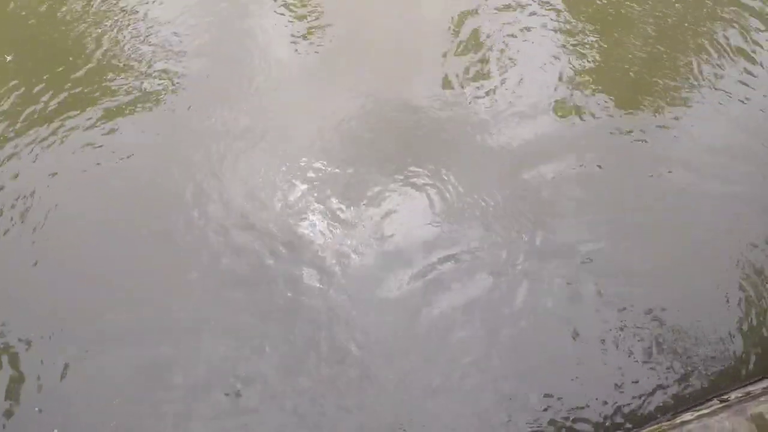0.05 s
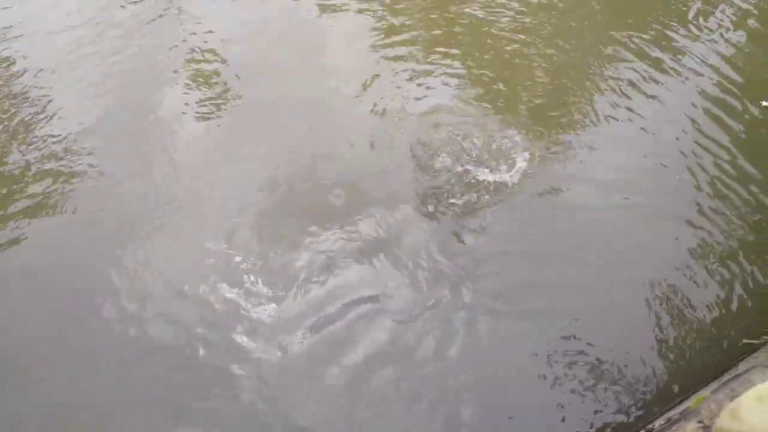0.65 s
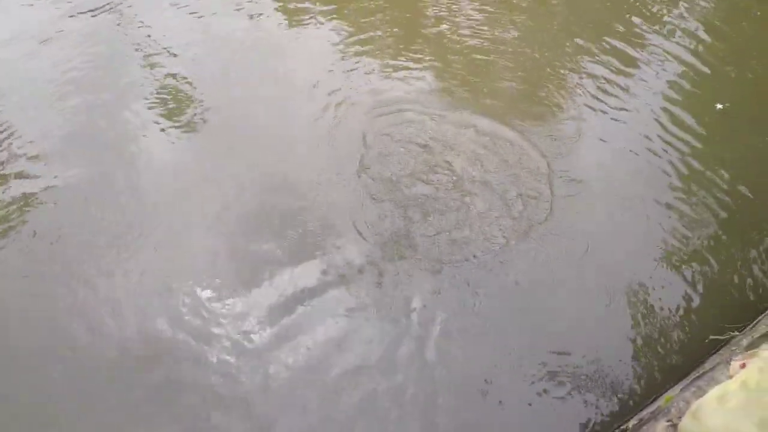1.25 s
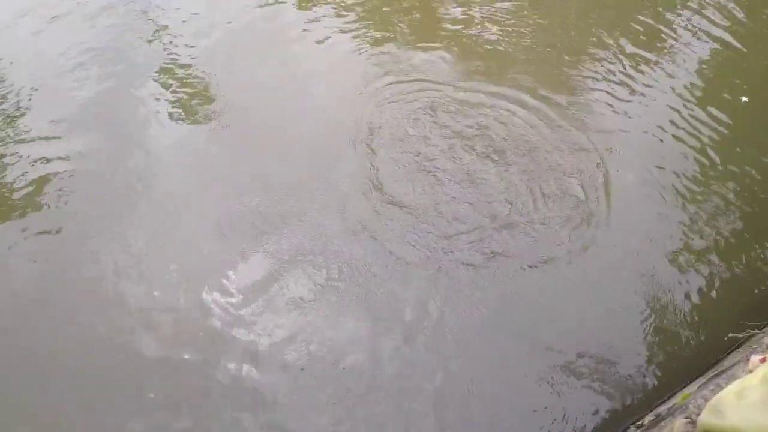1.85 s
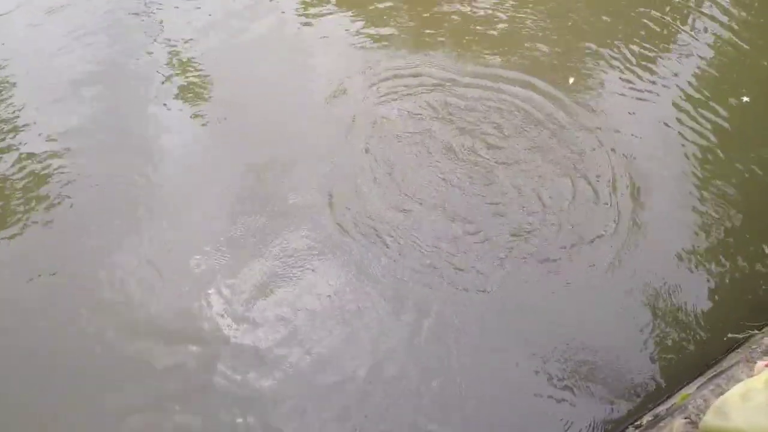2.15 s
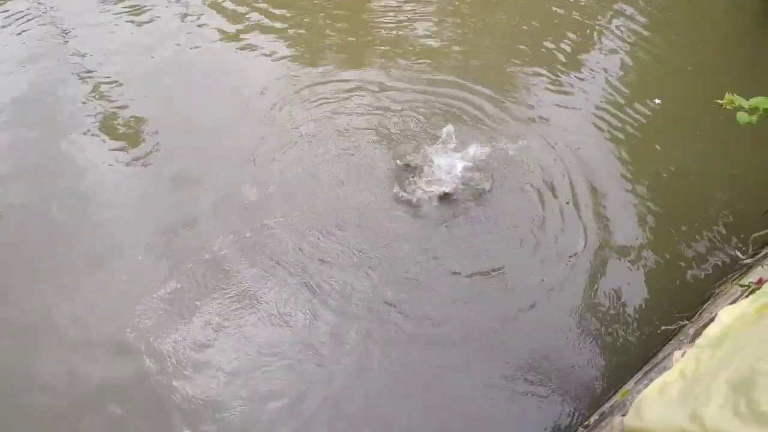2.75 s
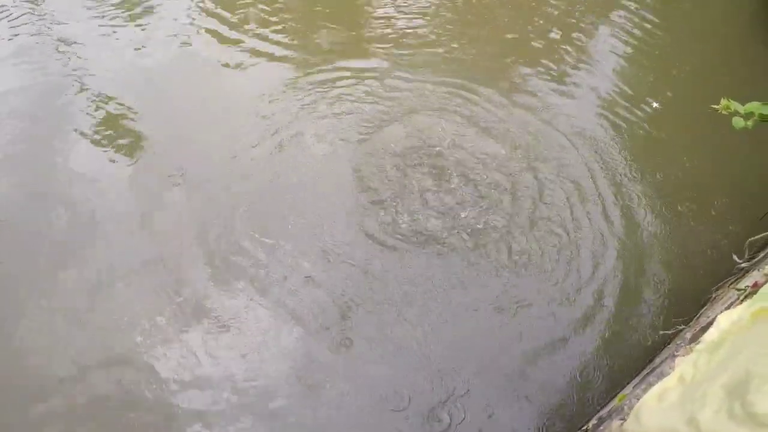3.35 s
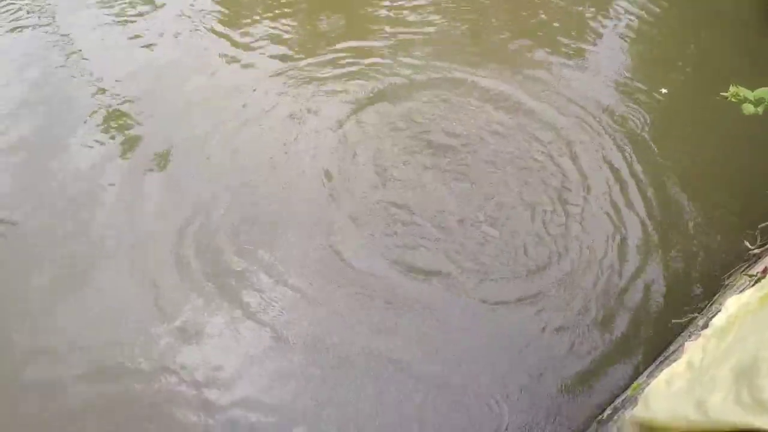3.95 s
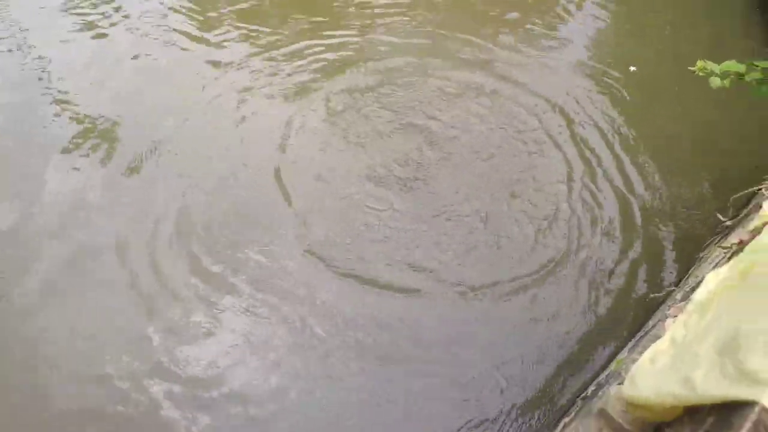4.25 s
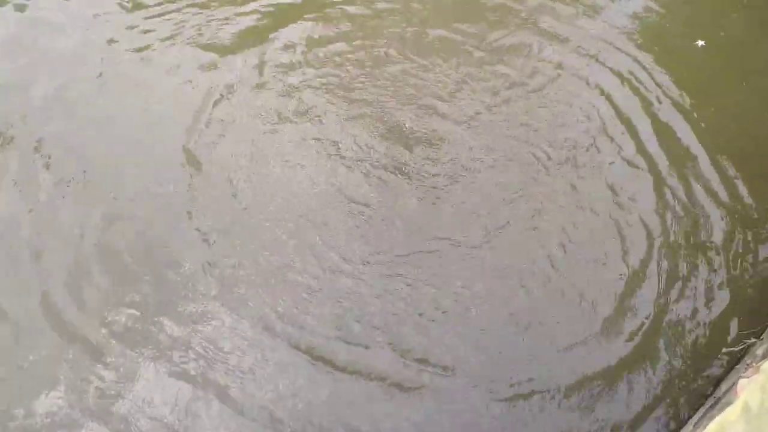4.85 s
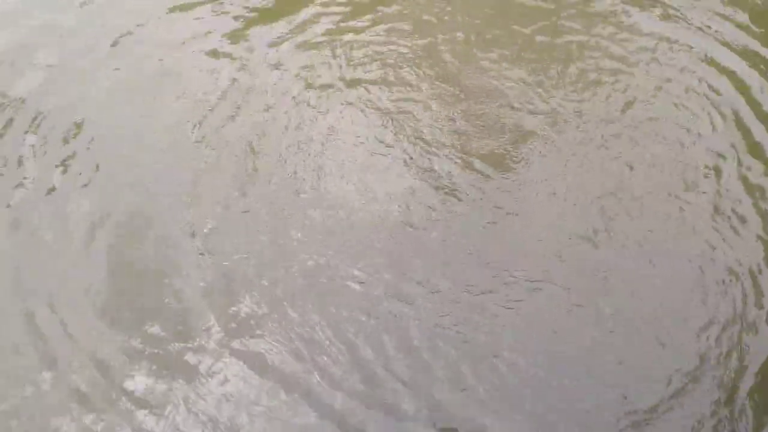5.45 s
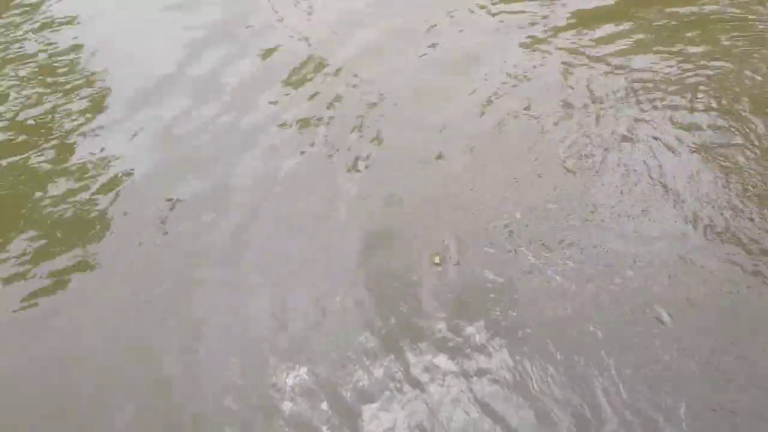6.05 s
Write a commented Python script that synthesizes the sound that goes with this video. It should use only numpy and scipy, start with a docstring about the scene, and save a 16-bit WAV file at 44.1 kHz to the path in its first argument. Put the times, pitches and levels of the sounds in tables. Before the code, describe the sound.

A low outdoor rumble, a distant machine hum and a faint hiss run throughout. Right from the start, fish make small wet ticks and plops at the surface of a pond. At 0.5 seconds comes a short splash with slaps and bubbling water, and drops patter back until about 1.6 seconds. After a lull, a few plops at 2.4 seconds lead into a louder double splash from 2.7 to 3.1 seconds, slightly left of centre, with sharp slaps, hollow gulps and spray that fizzes away. Between 4.0 and 4.4 seconds, four dry knocks strike the microphone's casing, mostly on the left, the second much the loudest. A crow then caws from the trees at about 4.6, 5.2 and 5.8 seconds, each call short, raspy and fairly quiet, with a slight echo.

```python
"""Fish in a pond, knocks and a crow.

Fish break the surface twice: slaps, ringing bubbles, churned water, gulps and falling spray.
Four dry knocks ring the microphone's casing. A crow then caws three times from the trees,
its pulses and breath ringing throat and beak. Under it all: low rumble, distant hum, faint hiss."""
import sys
import numpy as np
from scipy import signal
from scipy.fft import rfft, irfft, next_fast_len
from scipy.io import wavfile
from scipy.ndimage import uniform_filter1d

SR = 44100
rng = np.random.default_rng(int(sys.argv[2]) if len(sys.argv) > 2 else 0)


def generate_wav(sig):
    """Save sig (samples, or channels by samples) to the path in sys.argv[1] as 16-bit PCM at SR."""
    pcm = np.round(np.clip(np.atleast_2d(sig).T, -1, 1) * 32767).astype(np.int16)
    wavfile.write(sys.argv[1], SR, pcm)


N = 269255
TIME_S = np.arange(N) / SR

# outdoor rumble (frequency [Hz], relative density [dB])
RUMBLE_SPECTRUM = [(12, -36), (20, -5.5), (54, 2), (66, -4.5), (75, -8.5), (113, -8), (193, -12),
                   (280, -18), (312, -20), (342, -21), (406, -20.5), (527, -25.5), (800, -37),
                   (1040, -65.5), (1760, -120)]
# open-air hiss (frequency [Hz], relative density [dB])
HISS_SPECTRUM = [(410, -32.5), (700, -1), (843, -6.5), (1010, -0.5), (1180, -5), (1420, -8.5), (1810, -10),
                 (3680, -14), (4190, -15), (4780, -13.5), (5270, -17), (6480, -22), (7470, -29),
                 (9500, -34)]
# stereo width of rumble and hiss (frequency [Hz], side minus mid [dB])
SIDE_SPECTRUM = [(60, 5), (100, 0.5), (180, 4), (320, 0), (560, -3), (980, -1), (1710, -1), (2980, 0),
                 (5210, -0.5), (9110, -2)]
# distant machine hum (centre [Hz], width [Hz], level [dB])
HUM_BANDS = [(51.2, 6.9, -49), (99.9, 7.5, -45.5), (188.9, 4.1, -54), (308, 17.4, -55)]
# swell of a thin hiss band (time [s], level [dB])
SIZZLE_LEVELS = [(0, -58), (1.8, -68), (2.25, -56.5), (2.6, -59), (4.9, -61), (5.7, -64), (6.1, -70)]
# fins and drops striking the water (time [s], peak [dB], centre [Hz], pan L-R [dB])
SLAP_HITS = [(0.1205, -20, 4830, -3), (.209, -31.5, 4770, 3), (0.3806, -26.5, 3870, -9),
             (.468, -24, 4600, -8), (0.5053, -13.5, 1800, 2), (0.515, -17.5, 3900, -7),
             (0.5883, -18.5, 5000, -8), (0.6308, -19.5, 4400, -1), (.808, -19.5, 3500, -7),
             (.8674, -26.5, 4200, -1), (1.041, -31.5, 5000, -14), (1.1635, -29, 3900, -7),
             (1.1924, -24.5, 4700, -7), (1.2287, -28, 4600, -9), (2.38, -30, 4700, 0),
             (2.4282, -23.5, 3170, -2), (2.526, -29, 4670, -6.5), (2.609, -27.5, 6400, -9),
             (2.665, -24.5, 4300, -9), (2.6888, -20.5, 4000, -5.5), (2.7429, -10.5, 3400, -13.5),
             (2.8806, -11.5, 3900, -6), (2.9622, -19, 4000, -3)]
# ringing air pockets (time [s], relative peak [dB], pitch [Hz], t60 [s], pan L-R [dB])
PLOP_BUBBLES = [(.121, -20, 1140, 0.0054, -7), (.121, -25.5, 430, 0.0093, -7),
                (0.379, -21.5, 1920, 0.0034, -5), (.506, -7, 1390, 0.005, -9), (.507, -18, 850, 0.0081, -2),
                (.695, -21, 985, 0.037, -5), (.43, -30, 2100, 0.022, 1), (.545, -29, 900, .015, -2),
                (.633, -31, 1280, 0.018, -3), (0.646, -27, 1600, 0.022, 0), (.783, -27, 1370, 0.032, -4),
                (0.809, -25.5, 1860, 0.013, -1), (1.082, -40, 1520, .025, 0),
                (1.1624, -24.5, 2020, 0.011, 7), (2.428, -21, 1030, 0.044, -9),
                (2.428, -19, 650, 0.0032, -2), (2.665, -22.5, 1090, 0.0066, -1),
                (2.7083, -9, 1320, 0.018, -0.5), (2.742, -14, 940, 0.024, -4), (2.76, -17, 1330, .05, -6),
                (2.775, -23, 1333, 0.044, -17), (2.92, -16.5, 660, 0.0067, -12),
                (2.961, -11, 1080, 0.0091, -10), (2.962, -18, 1300, 0.04, -14)]
# water thrown up or falling back (time [s], hold [s], fade [dB/s], churn gain [dB], spray gain [dB])
WATER_SURGES = [(0.381, 0.11, 298, -41, -45), (0.502, 0.0081, 200, -28.5, -30),
                (0.575, 0.15, 126, -38, -34.5), (0.768, 0.014, 128, -37.5, -35),
                (1.056, 0.13, 116, -50.5, -46.5), (1.208, 0.036, 204, -62, -46.5),
                (2.699, 0.014, 203, -28, -31), (2.742, 0.031, 74, -28, -26.5),
                (2.912, 0.034, 104, -33.5, -40), (2.945, 0.04, 96, -28.5, -30.5),
                (3.055, 0.026, 126, -48, -33)]
# churned water's filter (frequency [Hz], gain [dB])
CHURN_EQ = [(200, -7.5), (400, -12), (800, -5.5), (1050, -0.5), (1380, 2), (1900, -1), (2600, -12.5),
            (4000, -28)]
# spray's filter (frequency [Hz], gain [dB])
SPRAY_EQ = [(1200, -9), (2200, -5.5), (3500, 0.5), (5000, 0), (6800, -3), (9000, -11)]
# hollows closing (time [s], hold [s], fade [dB/s], level [dB], centre [Hz], glide [Hz/s], pan L-R [dB])
HOLLOWS = [(0.505, .008, 400, -39, 1350, 500, 2), (2.754, 0.017, 261, -30.5, 1290, 500, -7),
           (2.949, 0.015, 247, -35, 1347, 900, -15)]
# drops falling back (time [s], hold [s], fade [dB/s], level [dB], centre [Hz], width [Hz])
DROP_FALL = (1.1, 0.43, 248, -59.5, 4452, 898)
# knocks on the casing (time [s], gain [dB], tilt [dB/octave], contact cut-off [Hz], pan L-R [dB])
KNOCK_HITS = [(3.959, -30.5, 5.5, 2800, 20), (4.008, -13.5, -2, 8500, 10.5), (4.269, -30, 4, 5000, 5),
              (4.3471, -26.5, 0.5, 6000, 14)]
# casing modes (frequency [Hz], gain [dB], t60 [s])
CASING_MODES = [(420, -6.5, 0.0042), (866, -2, 0.005), (1280, -5.5, 0.0022), (2220, -10, 0.002),
                (3900, -15.5, 0.0024), (6500, -21, 0.0037)]
# caws (time [s], hold [s], gain [dB], top pitch [Hz], pitch rise [s], air over pulses [ratio],
#   throat flanks [dB], gape delay [s], beak centre [Hz], beak width [Hz], beak gain [dB],
#   beak lift at gape [dB], rasp overtones [dB], gape resonance [dB])
CAWS = [(4.555, 0.21, -38, 374, .115, 0.96, -11.5, 0.059, 2800, 800, -15, 7, -22, -13),
        (5.215, 0.19, -39.5, 365, 0.078, 1.6, -7.5, 0.055, 2650, 327, -14, 14, -26, -6),
        (5.806, 0.21, -42, 368.6, .125, 0.94, -6.5, 0.074, 2690, 300, -13.5, 1, -34, -12)]
# throat resonances either side of the main one (centre [x pitch], width [Hz], gain [dB])
FLANK_BANDS = [(3.0, 200, 2), (4.95, 228, 5)]
# overtones carrying the rasp (centre [Hz], width [Hz], gain [dB])
RASP_BANDS = [(4980, 570, 1), (6900, 640, -15)]


def undb(db):
    """Decibels to gain."""
    return 10 ** (np.asarray(db) / 20)


def unit(x):
    """Scale to rms 1."""
    return x / np.sqrt(np.mean(x ** 2) + 1e-18)


def pan(pan_db):
    """Stereo gains from left minus right."""
    return undb(np.array([[pan_db], [-pan_db]]) / 2)


def add(out, start_s, sound):
    """Mix a sound in at a time."""
    i = max(int(start_s * SR), 0)
    out[:, i:i + sound.shape[-1]] += sound[..., :max(N - i, 0)]


def drift(rate_hz):
    """Smooth random curve, rms 1."""
    step = int(SR / rate_hz)
    stairs = np.repeat(rng.standard_normal(N // step + 1), step)
    return unit(uniform_filter1d(uniform_filter1d(stairs, step), step)[:N])


def envelope(start_s, hold_s, fade_db_per_s, attack_s=0.0053):
    """Linear rise, hold, exponential fade."""
    age_s = TIME_S - start_s
    return np.clip(age_s / attack_s, 0, 1) * undb(-fade_db_per_s * np.maximum(age_s - hold_s, 0))


def colour(x, points):
    """Filter by (frequency [Hz], gain [dB]) points."""
    hz, db = np.transpose(points)
    size = next_fast_len(N + 4096)
    bins_hz = np.maximum(np.fft.rfftfreq(size, 1 / SR), 1)
    gain = undb(np.interp(np.log(bins_hz), np.log(hz), db))
    return irfft(rfft(x, size) * gain, size)[..., :N]


def resonate(x, hz, width_hz):
    """Two-pole resonance, gain 1 at centre."""
    return signal.lfilter(*signal.iirpeak(hz, hz / min(width_hz, SR / 4), fs=SR), x)


def glide_resonate(x, hz, width_hz):
    """Steep resonance with a moving centre."""
    carrier = np.exp(2j * np.pi * np.cumsum(hz) / SR)
    lowpass = signal.bessel(2, width_hz / 2, fs=SR, output="sos")
    return np.real(carrier * signal.sosfilt(lowpass, x / carrier))


def resonances(x, bands, scale=1):
    """Summed resonances, rms 1; scale multiplies their centres."""
    return unit(sum(undb(db) * glide_resonate(x, np.full(N, centre) * scale, width_hz)
                    for centre, width_hz, db in bands))


def ring(hz, t60_s, glide, rise_cycles):
    """Damped sine, peak 1; pitch climbs by the fraction glide."""
    t = np.arange(int(t60_s * SR) + 2) / SR
    wave = np.sin(2 * np.pi * hz * t * (1 + glide * t / t60_s / 2)) * undb(-60 * t / t60_s)
    wave *= 1 - np.exp(-t * hz / rise_cycles)
    return wave / (np.abs(wave).max() + 1e-12)


def scatter(x, t60_s, rise_s):
    """Diffuse echo, different on each side."""
    t = np.arange(SR) / SR
    tail = rng.standard_normal((2, SR)) * undb(-60 * t / t60_s) * (1 - np.exp(-t / rise_s))
    tail /= np.sqrt(np.sum(tail ** 2) / 2)
    return signal.fftconvolve(np.atleast_2d(x), tail, axes=1)[:, :N]


def noise_bed(spectrum):
    """Coloured stereo noise, drifting slightly in level."""
    mid, side = colour(rng.standard_normal((2, N)), spectrum)
    stereo = mid + colour(side, SIDE_SPECTRUM) * np.array([[1], [-1]])
    return undb(0.5 * drift(4)) * stereo / np.std(mid)


def outdoors():
    """Wide rumble, even hiss, wavering machine hum and a thin sizzle that swells and sinks."""
    rumble = undb(-34.5) * pan(-2.9) * noise_bed(RUMBLE_SPECTRUM)
    hiss = undb(-50) * pan(0.27) * noise_bed(HISS_SPECTRUM)
    hum = 0
    for hz, width_hz, db in HUM_BANDS:
        band = resonate(rng.standard_normal(N), hz, width_hz)
        hum += undb(db) * unit(resonate(band, hz, width_hz))
    sizzle = glide_resonate(rng.standard_normal((2, N)), hz=4820 * (1 + 0.012 * drift(2.4)), width_hz=300)
    sizzle_db = np.interp(TIME_S, *np.transpose(SIZZLE_LEVELS))
    return rumble + hiss + hum + undb(sizzle_db) * unit(sizzle)


def slaps(attack_s=0.0004, cutoff_hz=7100):
    """Fins and drops crack on the surface over a duller push of water; harder is longer and broader."""
    out = np.zeros((2, N))
    t = np.arange(SR // 10) / SR
    treble_cut = signal.butter(2, cutoff_hz, fs=SR)  # gentle low-pass: less treble
    for start_s, db, hz, pan_db in SLAP_HITS:
        t60_s = 0.011 * 2 ** (db / 12)
        width_hz = 0.65 * hz * 2 ** ((db + 9.5) / 22)
        noise = np.sign(rng.standard_normal(len(t)) + 0.91 * rng.standard_normal((2, len(t))))
        contact = noise * undb(-60 * t / t60_s) * (1 - np.exp(-t / attack_s))
        crack = resonate(contact, hz, width_hz)
        push = undb(-6) * resonate(contact, 0.26 * hz, 0.25 * hz)
        slap = signal.lfilter(*treble_cut, crack + push)
        add(out, start_s, undb(db) * pan(pan_db) * slap / np.abs(slap).max(axis=1, keepdims=True))
    return out


def plops(wobble_depth=0.35):
    """Trapped air rings, shakes unevenly and climbs in pitch on its way up."""
    out = np.zeros((2, N))
    for start_s, db, hz, t60_s, pan_db in PLOP_BUBBLES:
        add(out, start_s, undb(db) * pan(pan_db) * ring(hz, t60_s, glide=0.08, rise_cycles=1.1))
    wobble = 1 + wobble_depth * np.array([drift(500), drift(500)])
    return undb(-5) * out * wobble


def swarm(low_hz, high_hz, cycles, spread_db, max_pan_db, count):
    """Steady swarm of ringing bubbles across the water, rms 1."""
    out = np.zeros((2, N))
    for when, pitch, strength, place, life in rng.random((count, 5)):
        hz = low_hz * (high_hz / low_hz) ** pitch
        gain = undb(spread_db * min(-np.log(1 - strength), 4))
        bubble = ring(hz, t60_s=cycles * (0.5 + life) / hz, glide=0.026, rise_cycles=0.029)
        add(out, when * N / SR, gain * pan(max_pan_db * (2 * place - 1)) * bubble)
    return unit(out)


def churn(bubbles):
    """Churned water rings with mid-sized bubbles in each surge."""
    power = sum((undb(db) * envelope(start_s, hold_s, fade_db_per_s)) ** 2
                for start_s, hold_s, fade_db_per_s, db, _ in WATER_SURGES)
    return undb(-1) * pan(-1.5) * unit(colour(bubbles, CHURN_EQ)) * np.sqrt(power)


def spray(foam_db=-17.5, foam_fade_db_per_s=21):
    """Droplets and mist crackle above each surge; foam fizzes on after it."""
    droplets = swarm(1800, 9000, cycles=4, spread_db=2.4, max_pan_db=30, count=40000)
    mist = colour(rng.standard_normal((2, N)), SPRAY_EQ + [(12000, -41)])
    crackle = unit(unit(colour(droplets, SPRAY_EQ)) + undb(-2.5) * unit(mist))
    power = 0
    for start_s, hold_s, fade_db_per_s, _, db in WATER_SURGES:
        surge = envelope(start_s, hold_s, fade_db_per_s)
        foam = undb(foam_db) * envelope(start_s, hold_s, foam_fade_db_per_s)
        power += undb(db) ** 2 * (surge ** 2 + foam ** 2)
    return undb(-2.5) * pan(-5.5) * crackle * np.sqrt(power)


def gulps(bubbles):
    """Hollows close behind the fish: a rising resonance on the bubbles."""
    out = np.zeros((2, N))
    for start_s, hold_s, fade_db_per_s, db, hz, glide_hz_per_s, pan_db in HOLLOWS:
        centre_hz = hz + glide_hz_per_s * np.clip(TIME_S - start_s, 0, 0.15)
        hollow = unit(glide_resonate(bubbles, centre_hz, width_hz=330))
        out += undb(db) * pan(pan_db) * hollow * envelope(start_s, hold_s, fade_db_per_s)
    return out


def patter():
    """The first splash's last drops fall back into the pond."""
    start_s, hold_s, fade_db_per_s, db, hz, width_hz = DROP_FALL
    drops = swarm(3500, 5500, cycles=14, spread_db=3, max_pan_db=16, count=1500)
    return undb(db) * unit(resonate(drops, hz, width_hz)) * envelope(start_s, hold_s, fade_db_per_s)


def knocks():
    """Damped casing modes in alternating polarity; light touches are brighter, soft ones lose the top."""
    out = np.zeros((2, N))
    pivot_hz = CASING_MODES[1][0]
    for start_s, db, tilt_db_per_oct, cutoff_hz, pan_db in KNOCK_HITS:
        contact = signal.butter(3, cutoff_hz, fs=SR)
        for k, (hz, mode_db, t60_s) in enumerate(CASING_MODES):
            gain = (-1) ** k * undb(db + mode_db + tilt_db_per_oct * np.log2(hz / pivot_hz))
            mode = signal.lfilter(*contact, ring(hz, t60_s, glide=0.3, rise_cycles=1.5))
            add(out, start_s, gain * pan(pan_db) * mode)
    return out + undb(-15) * scatter(out, t60_s=0.06, rise_s=0.001)


def rasping_pulses(pitch_hz, rasp, noise):
    """Crow's voice source: one pulse and one puff of air per cycle."""
    cycles = np.cumsum(pitch_hz) / SR
    pulses = unit(np.diff(np.floor(cycles), prepend=0))
    air = unit(noise * np.exp(-(cycles % 1) / 0.37))
    return (pulses + rasp * air) / np.hypot(1, rasp)


def crow(rattle_hz=62, climb_hz_per_s=560, sag_hz_per_s=230, gape_width_s=0.028, beak_hz_per_s=-1200):
    """Rattling pulses ring throat and beak; each caw arches in pitch and the trees smear it."""
    waver = 1 + 0.025 * drift(300)
    rattle = 1 + 0.4 * np.sin(2 * np.pi * np.cumsum(rattle_hz * (1 + 0.25 * drift(30))) / SR)
    noise = rng.standard_normal(N)
    voice = 0
    for (start_s, hold_s, db, top_hz, rise_s, rasp, flank_db, gape_s,
         beak_hz, beak_width_hz, beak_db, lift_db, overtone_db, mouth_db) in CAWS:
        age_s = TIME_S - start_s
        past_top_s = np.clip(age_s, 0, 0.5) - rise_s
        pitch_hz = top_hz + np.minimum(climb_hz_per_s * past_top_s, -sag_hz_per_s * past_top_s)
        gape = np.exp(-((age_s - gape_s) / gape_width_s) ** 2)  # open beak: louder, harsher
        source = rasping_pulses(pitch_hz * waver, rasp + 0.69 * gape, noise) * rattle
        throat = unit(glide_resonate(source, 4 * pitch_hz, width_hz=300))
        flanks = undb(flank_db) * resonances(source, FLANK_BANDS, pitch_hz)
        slide_hz = beak_hz_per_s * np.clip(age_s - gape_s, -gape_width_s, gape_width_s)
        beak = unit(glide_resonate(source, beak_hz + slide_hz, beak_width_hz))
        beak *= undb(beak_db + lift_db * gape)
        overtones = undb(overtone_db + 8 * gape) * resonances(source, RASP_BANDS)
        mouth = undb(mouth_db) * gape * unit(glide_resonate(source, hz=np.full(N, 1720), width_hz=65))
        effort = undb(db + 2 * gape) * envelope(start_s, hold_s, fade_db_per_s=94, attack_s=0.017)
        voice += effort * (throat + flanks + beak + overtones + mouth)
    trees = undb(-5) * scatter(voice, t60_s=0.36, rise_s=0.004)
    return undb(-0.5) * (voice * pan(1.5) + trees)


def scene():
    """Full mix; slaps reflect off the rippled surface, all water sounds off the banks."""
    cracks = slaps()
    bubbles = swarm(300, 3000, cycles=12, spread_db=2.2, max_pan_db=16, count=14000)
    splashes = churn(bubbles) + spray() + gulps(bubbles) + patter()
    surface_echo = undb(-9.5) * scatter(cracks, t60_s=0.02, rise_s=0.0032)
    water = cracks + surface_echo + plops() + splashes
    bank_echo = undb(-20) * scatter(water, t60_s=0.35, rise_s=0.02)
    return water + bank_echo + knocks() + crow() + outdoors()


def record(dry, microphone_hz=7500, recorder_hz=9500):
    """Microphone treble roll-off, then the recorder's steep low-pass."""
    soft = signal.sosfilt(signal.butter(6, microphone_hz, fs=SR, output="sos"), dry)
    return signal.sosfilt(signal.ellip(8, 0.2, 70, recorder_hz, fs=SR, output="sos"), soft)


dry = scene()
out = record(dry)
generate_wav(out)
```